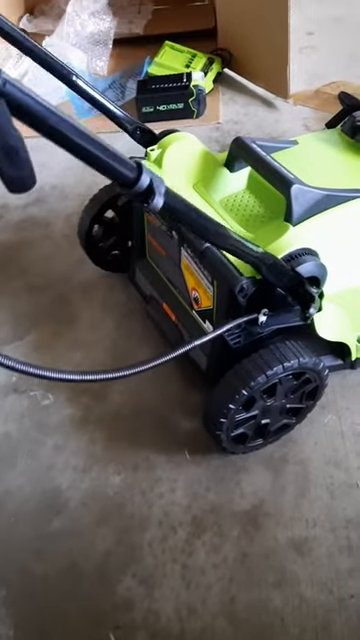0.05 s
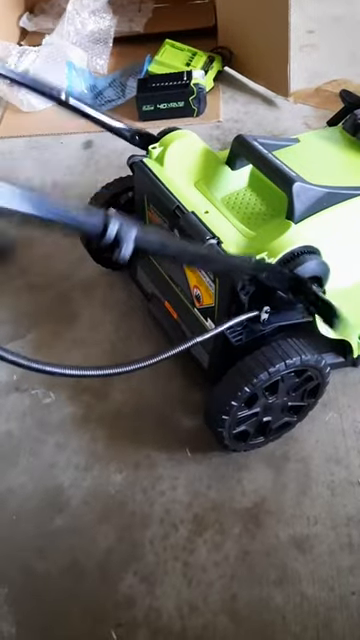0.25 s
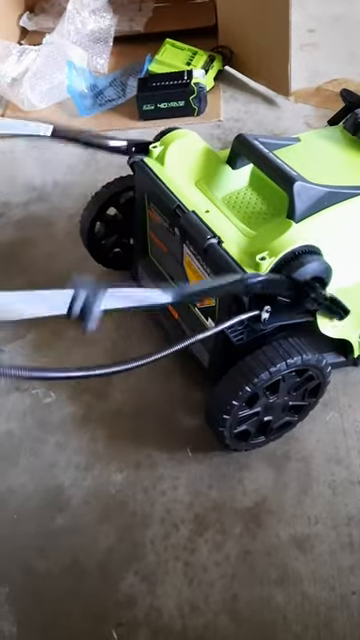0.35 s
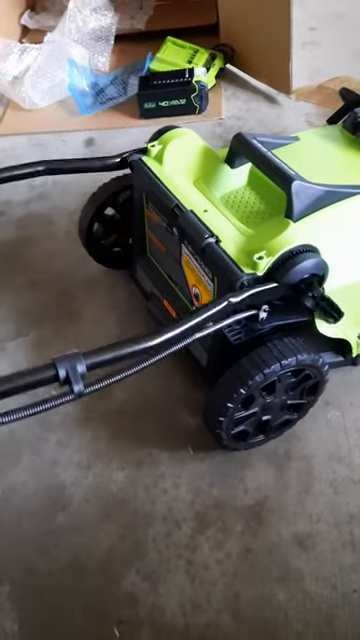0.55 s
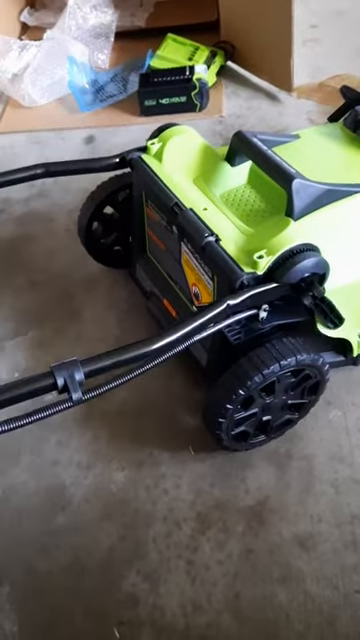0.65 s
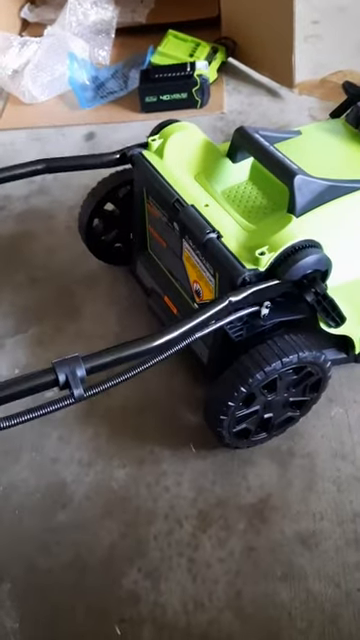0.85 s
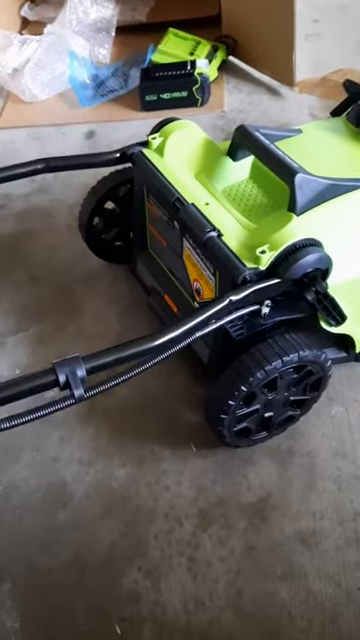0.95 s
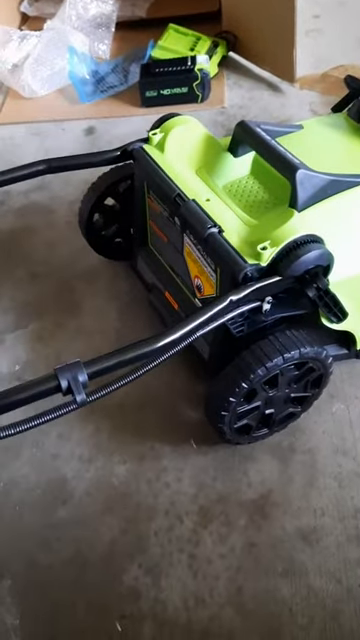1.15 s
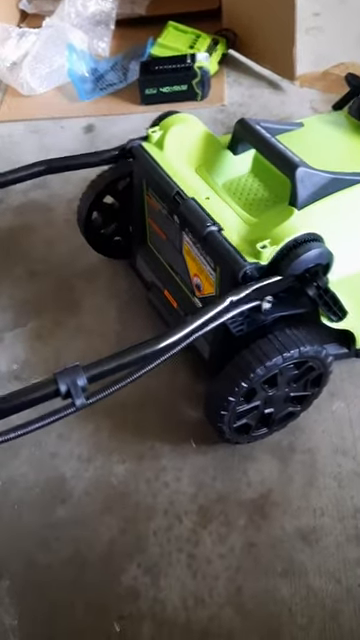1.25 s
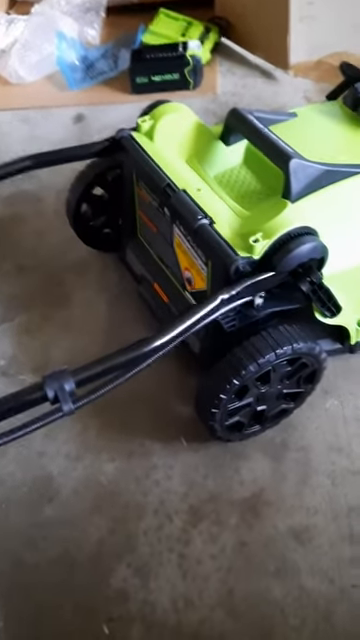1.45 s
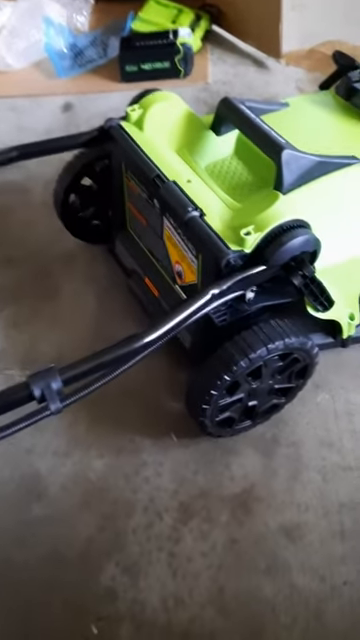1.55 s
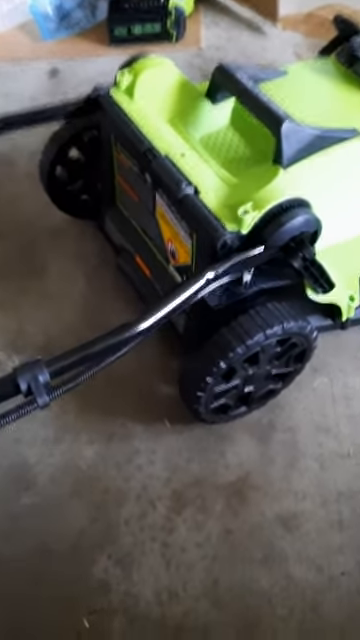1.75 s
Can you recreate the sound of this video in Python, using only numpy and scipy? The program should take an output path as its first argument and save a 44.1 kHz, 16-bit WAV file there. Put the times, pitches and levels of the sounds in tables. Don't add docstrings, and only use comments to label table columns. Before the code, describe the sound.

Tube handle on a plastic mower deck rattles, scrapes and clunks into place within half a second; the concrete garage rings briefly, then quiet hum, soft rustling and tiny knocks, picked up close by a phone.

```python
import sys
import numpy as np
from scipy import signal
from scipy.fft import rfft, irfft
from scipy.io import wavfile
from scipy.ndimage import uniform_filter1d

SR = 44100
rng = np.random.default_rng(int(sys.argv[2]) if len(sys.argv) > 2 else 0)


def generate_wav(sig):
    pcm = np.round(np.clip(np.atleast_2d(sig).T, -1, 1) * 32767).astype(np.int16)
    wavfile.write(sys.argv[1], SR, pcm)


def volts(x):
    e = np.asarray(x, float) / 20
    return 10 ** e


N = 79380
TIME_S = np.arange(N) / SR
LEFT_RIGHT = np.array([[1], [-1]])
LATCHED_S, LATCHED_TUBE_DB = 0.42, -14
CLOSE_FROM_S = 1.5


def unit(x):
    return x / np.sqrt(np.mean(x ** 2))


def peak(x):
    return x / abs(x).max()


def energy(x):
    return x / np.sqrt(np.sum(x ** 2))


def over_hz(table, size):
    hz, value = np.array(table).T
    return np.interp(np.log(np.fft.rfftfreq(size, 1 / SR) + 1), np.log(hz), value)


def colour(x, table):
    size = x.shape[-1]
    return irfft(rfft(x) * volts(over_hz(table, size)), size)


def over_time(table):
    s, db = np.array(table).T
    return volts(np.interp(TIME_S, s, db))


def band(x, hz, wide):
    wide = max(wide, 1.001)
    edges_hz = [hz / wide, min(hz * wide, 0.45 * SR)]
    return signal.sosfilt(signal.butter(2, edges_hz, "band", fs=SR, output="sos"), x)


def ring(modes, gains):
    t = np.arange(SR // 2) / SR
    return sum(gain * volts(db - 60 * t / t60) * np.sin(2 * np.pi * hz * t)
               for (hz, db, t60), gain in zip(modes, gains))


def add(out, s, x):
    i = int(s * SR)
    out[i:i + len(x)] += x[:N - i]


# f/Hz, level/dB
PORT_DIFFERENCE = [(100, -20.5), (300, -15.5), (600, -2.5), (1200, 0.5), (3000, 0), (12000, 1)]


def pair(size):
    mid, side = rng.standard_normal((2, size))
    return mid + colour(side, PORT_DIFFERENCE) * LEFT_RIGHT


def grains(per_s, spread_db):
    on = rng.random(N) < per_s / SR
    size = np.minimum(rng.exponential(size=N), 3.0)
    return unit(on * volts(spread_db * size) * rng.standard_normal(N))


# t/s, peak/dB, centre f/Hz, burst/ms, tube ring/dB
LATCH_CLICKS = [(0.1617, -36, 4990, 2.6, -3.5), (0.190, -29, 1140, 2.22, -22),
                (0.2183, -29.5, 4470, 1.95, -30.5), (0.2205, -31, 8900, 3.5, -24.5),
                (0.2435, -25.5, 4450, 17, -6), (0.2808, -19.5, 4455, 3.64, -2.5),
                (0.3355, -9, 1900, 1.69, 0), (0.3366, -11, 4400, 1.47, -36.5),
                (0.3377, -17, 7300, 1.3, -37), (0.336, -20, 12700, 2.4, -30),
                (0.4183, -8.5, 8600, 1.58, -29.5), (0.4177, -8, 4815, 2.68, -26.5),
                (0.4197, -11.5, 3525, 6.6, -33.5), (0.454, -18, 3000, 1.86, -26.5),
                (0.4769, -15, 11680, 2.1, -33), (0.4813, -12.5, 2950, 1.12, -33.5),
                (0.515, -15, 2000, 1.376, -24.5), (.497, -23, 4300, 6.3, -31),
                (0.509, -28.5, 4110, 3.47, -37), (0.543, -26, 3000, 3.4, -37),
                (.612, -30.5, 11530, 4.6, -9.5), (.624, -30, 5950, 1.52, 2.5),
                (1.4806, -51, 2000, 1.18, -44), (1.4839, -44.5, 1807, 0.96, -42),
                (1.554, -46.5, 1990, 0.75, -37), (1.735, -51, 2400, 1.86, -12)]
# t/s, peak/dB, centre f/Hz
FITTING_TICKS = [(.175, -32, 2987), (0.193, -27, 1555), (.209, -34.5, 1693), (0.227, -33, 4576),
                 (.276, -24, 7000), (0.287, -13.5, 4664), (0.295, -23, 4520), (.301, -23.5, 4604),
                 (.306, -24, 4630), (.318, -21.5, 2212), (.343, -24, 2310), (0.348, -22, 2222),
                 (0.352, -20, 2298), (.354, -21.5, 4605), (0.362, -26.5, 4720), (0.369, -30, 1900),
                 (.383, -28, 4481), (0.388, -34, 4500), (.423, -15.5, 5094), (0.427, -30.5, 8220),
                 (0.429, -24.5, 4250), (.437, -24, 1950), (.456, -17.5, 8460), (0.461, -27, 4000),
                 (.472, -24, 2471), (.485, -20.5, 5950), (.490, -24.5, 3750), (0.501, -23, 2502),
                 (0.504, -21, 4223), (.523, -36, 2516), (.589, -34.5, 2480), (.611, -25.5, 4767),
                 (1.501, -60, 2270), (1.514, -59, 2400)]
# f/Hz, level/dB, t60/s
TUBE_MODES = [(1368.3, -17.5, 0.22), (1565, -18.5, 0.046), (1675.3, -12, 0.08), (1906.5, -8, 0.28),
              (2281, -3, 0.1032), (2454, -13.5, .1), (2840, -12.5, 0.074), (4400, -6.5, 0.023),
              (4775, -4, 0.042)]


def clicks():
    out, t = np.zeros(N), np.arange(SR // 20) / SR
    tick_ms, tick_ring_db = 3.06, -33
    latch_wide, tick_wide = 1.4005, 1.1276
    contact_rise_s, tube_rise_ms = 0.000046, 0.4
    rows = [(*click, latch_wide) for click in LATCH_CLICKS]
    rows += [(*tick, tick_ms, tick_ring_db, tick_wide) for tick in FITTING_TICKS]
    for s, db, hz, ms, ring_db, wide in rows:
        burst = rng.standard_normal(len(t)) * (1 - np.exp(-t / contact_rise_s)) * np.exp(-t * 1e3 / ms)
        crack = band(band(burst, hz, wide), hz, wide) + 0.058 * band(burst, 2.4 * hz, 1.6)
        mode_gains = volts(rng.standard_normal(len(TUBE_MODES))) * rng.choice([-1, 1], len(TUBE_MODES))
        tube = ring(TUBE_MODES, mode_gains)
        tube = tube * (1 - np.exp(-np.arange(len(tube)) / SR * 1e3 / tube_rise_ms))
        add(out, s, peak(crack) * volts(db))
        add(out, s, peak(tube) * volts(db + ring_db + LATCHED_TUBE_DB * (s > LATCHED_S)))
    return out


# t/s, peak/dB, pitch f/Hz, length/ms
DECK_SHUDDERS = [(0.163, -27, 300, 10.15), (0.178, -21, 235, 10.93), (.198, -21, 410, 8.17),
                 (.207, -16, 300, 8.56), (.218, -20.5, 295, 5.6), (0.239, -16, 320, 13.4),
                 (0.250, -13, 314.1, 21), (.251, -13, 430, 14.2), (.255, -19.5, 153, 38.2),
                 (.276, -12, 300, 5.66), (.288, -17.5, 242.2, 21.8), (.305, -17, 290, 17.4),
                 (0.320, -16.5, 250, 10.8), (0.336, -23.5, 290, 8.5), (0.349, -14.5, 300, 11),
                 (0.369, -14, 318.3, 11), (0.405, -21, 290, 10), (0.428, -13, 393, 5.8),
                 (.437, -14.5, 300, 12), (.451, -13.5, 310, 9.53), (.482, -8.5, 313.6, 25.9),
                 (.482, -19.5, 660, 10.63), (.514, -15.5, 240, 18.1), (0.529, -14, 300, 12.5),
                 (.549, -18.5, 290, 10.4), (.557, -15, 320, 5.5), (.574, -21, 229, 9),
                 (0.586, -23, 300, 4.8), (.606, -14.5, 305.9, 12.2), (.621, -13.5, 287.3, 13.12),
                 (.640, -22.5, 280, 6.83), (.711, -30.5, 300, 4.6), (0.782, -28.5, 278, 8.7),
                 (0.877, -43, 310, 6.1), (0.903, -35, 200, 14.8), (1.148, -43.5, 300, 12.3),
                 (1.351, -43.5, 288, 12.7), (1.496, -36, 240, 6), (1.5025, -30.5, 320, 10.4),
                 (1.635, -41, 344, 14), (1.696, -43.5, 617, 6.67)]
# f/Hz, level/dB, t60/s
DECK_MODES = [(162, -27, 0.05), (200, -5.5, 0.089), (228.63, -1.5, 0.12), (306.2, -1.5, .1),
              (333.74, -11, 0.1), (403.34, -4, 0.13), (438.9, -3, 0.065), (484.2, -4, 0.11),
              (579.6, -20, 0.075), (673.3, -13, 0.0195), (820, -26, .04), (954, -16, 0.038)]


def thumps():
    out, t = np.zeros(N), np.arange(SR // 10) / SR
    close_ring_db = -5
    for s, db, hz, ms in DECK_SHUDDERS:
        swell = abs(np.sin(np.pi * np.clip(t * 1e3 / ms, 0, 1))) ** 0.57
        push = swell * np.sin(2 * np.pi * hz * t)
        deck = ring(DECK_MODES, volts(3.2 * rng.standard_normal(len(DECK_MODES))))
        knock = peak(signal.fftconvolve(push, deck)) * volts(close_ring_db * (s > CLOSE_FROM_S))
        knock[:len(push)] += 1.2 * push
        add(out, s, peak(knock) * volts(db))
    return out


# t/s, level/dB
HINGE_FORCE = [(.15, -55.5), (.175, -38.5), (.235, -30), (.255, -29), (.29, -20.5), (.33, -26.5), (.4, -33),
               (.49, -21.5), (.53, -34.5), (.6, -32), (.66, -68)]
# f/Hz, density/dB per Hz
SCRAPE_COLOUR = [(290, -68.5), (500, 9.5), (678, 1.5), (2290, -14.5), (2690, -12.5), (4530, -13.5),
                 (5390, -16.5), (14900, -24.5), (16000, -33)]
# f/Hz, level/dB
LIGHT_SLIDE_COLOUR = [(4500, 1), (7500, -18.5)]


def slide():
    deck_db, tube_db, bite_db = -1, -10, -29.5
    slips, force = grains(per_s=4000, spread_db=3), over_time(HINGE_FORCE)
    held = volts(LATCHED_TUBE_DB * (np.arange(N) > LATCHED_S * SR))
    deck = energy(ring(DECK_MODES, np.ones(len(DECK_MODES))))
    tube = energy(ring(TUBE_MODES, np.ones(len(TUBE_MODES))))
    through_deck = signal.fftconvolve(slips * force, deck)[:N]
    through_tube = signal.fftconvolve(slips * force * held, tube)[:N]
    bright = unit(colour(slips, SCRAPE_COLOUR))
    dull = colour(bright, LIGHT_SLIDE_COLOUR)
    direct = (dull + (bright - dull) * np.clip(force / volts(bite_db), 0, 1)) * force
    return direct + volts(deck_db) * through_deck + volts(tube_db) * through_tube


# f/Hz, t60/s
GARAGE_DECAY = [(150, 0.21), (280, 0.4066), (500, 0.7958), (1000, 0.6579), (2000, 0.5), (4000, .5),
                (8000, 0.5924), (15000, 0.221)]
# f/Hz, level/dB
GARAGE_FEED_COLOUR = [(200, 2.5), (1000, 0.5), (2200, 0), (4500, -3), (8000, -4), (14000, -5)]


def garage(x):
    low_db, first_wall_ms = -5.5, 2.7
    t = np.arange(SR) / SR
    hz, t60 = np.array(GARAGE_DECAY).T
    tail = np.zeros((2, SR))
    for f in 122.68 * 2.0 ** np.arange(8):
        band_t60 = np.interp(np.log(f), np.log(hz), t60)
        tail += band(pair(SR), f, np.sqrt(2)) * volts(-60 * t / band_t60 + low_db * (f < 600))
    tail *= np.clip(t * 1e3 / first_wall_ms - 1, 0, 1)
    feed = colour(x, GARAGE_FEED_COLOUR)
    return signal.fftconvolve(feed[None], energy(tail) * np.sqrt(2), axes=1)[:, :N]


# f/Hz, density/dB per Hz
FLOOR_COLOUR = [(25, -34), (75, -2), (320, -7), (750, -22), (1400, -40.5), (3500, -41.5), (7500, -41.5),
                (12500, -39)]
# f/Hz, width/Hz, level/dB
HUM_BANDS = [(58.845, 7.1, -62), (85.1, 6.1, -54.5), (140.7, 7.5, -55.5), (200.9, 2.9, -60.5),
             (300, 49, -55)]
# f/Hz, density/dB per Hz
EARLIER_COLOUR = [(29, -42.5), (50, -8), (104, 0.5), (237, -10), (427, -5), (1180, -23), (2170, -10.5),
                  (2560, -16), (14000, -42)]
# t/s, level/dB
RUSTLE_LEVEL = [
    (1.12, -87.5),
    (1.25, -74),
    (1.38, -68.5),
    (1.43, -61.5),
    (1.55, -66.5),
    (1.65, -65),
    (1.8, -62.5),
]
# t/s, level/dB
FAR_HISS_LEVEL = [
    (.9, -83.5),
    (1.1, -67.5),
    (1.38, -59),
    (1.47, -71),
    (1.62, -74),
    (1.8, -60.5),
]


def floor():
    earlier_db, earlier_t60_s = -35, 0.567
    flicker = unit(uniform_filter1d(uniform_filter1d(rng.standard_normal(N), 1500), 1500))
    hiss = unit(colour(pair(N), FLOOR_COLOUR)) * volts(-49.5)
    hum = sum(unit(band(pair(N), hz, 1 + width_hz / hz / 2)) * volts(db + 0.53 * flicker)
              for hz, width_hz, db in HUM_BANDS)
    earlier = unit(colour(pair(N), EARLIER_COLOUR)) * volts(earlier_db - 60 * TIME_S / earlier_t60_s)
    cloth = pair(N) + 0.5 * grains(per_s=900, spread_db=1.76)
    rustle = unit(band(cloth, hz=1900, wide=1.477)) * over_time(RUSTLE_LEVEL)
    far_hiss = unit(band(pair(N), hz=7000, wide=2.9)) * over_time(FAR_HISS_LEVEL)
    return hiss + hum + earlier + rustle + far_hiss


def scene():
    deck_low_hz, shadow_ms, shadow_db, close_room_db = 193.3, 4.9, 0.5, 0.5
    low_cut = signal.butter(3, deck_low_hz, "high", fs=SR, output="sos")
    handle = signal.sosfilt(low_cut, clicks() + thumps() + slide())
    shade = energy(rng.standard_normal(900) * np.exp(-np.arange(900) / SR * 1e3 / shadow_ms))
    side = colour(np.convolve(handle, shade)[:N], PORT_DIFFERENCE) * volts(shadow_db)
    direct = handle + side * LEFT_RIGHT
    to_room = handle * volts(close_room_db * (np.arange(N) > CLOSE_FROM_S * SR))
    return direct * volts(-1.0) + garage(to_room) + floor()


def roll_off(x):
    return signal.sosfilt(signal.butter(12, 16830, fs=SR, output="sos"), x)


# f/Hz, level/dB
PORT_TILT = [(100, 2.5), (300, 1.1), (1000, 4.5), (2500, 1.5), (4500, -0.5), (8000, 1), (13000, 7.5)]


def record(dry):
    tilt = volts(over_hz(PORT_TILT, N) / 2 * LEFT_RIGHT)
    top_cut = signal.ellip(6, 0.3, 45, 14790, fs=SR, output="sos")
    mix = signal.sosfilt(top_cut, irfft(rfft(dry) * tilt, N))
    return roll_off(mix)


dry = scene()
out = record(dry)
generate_wav(out)
```